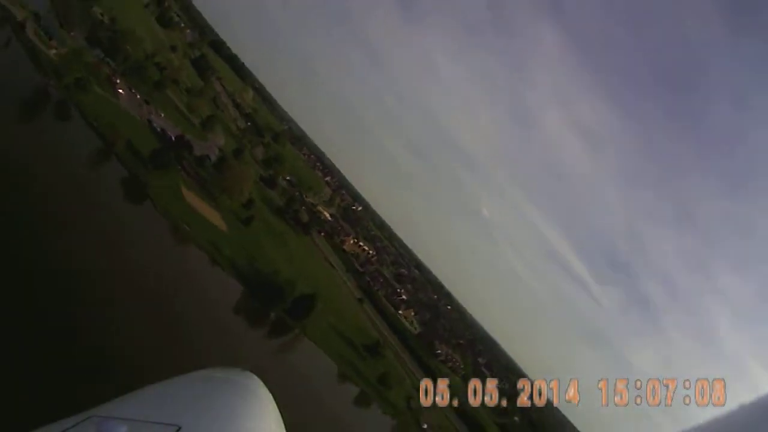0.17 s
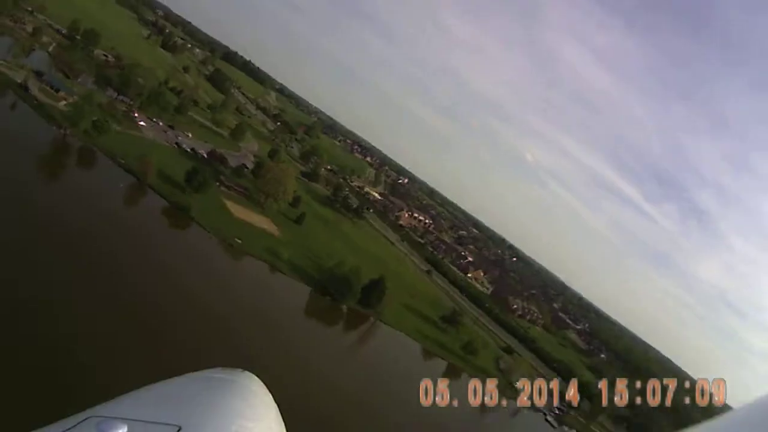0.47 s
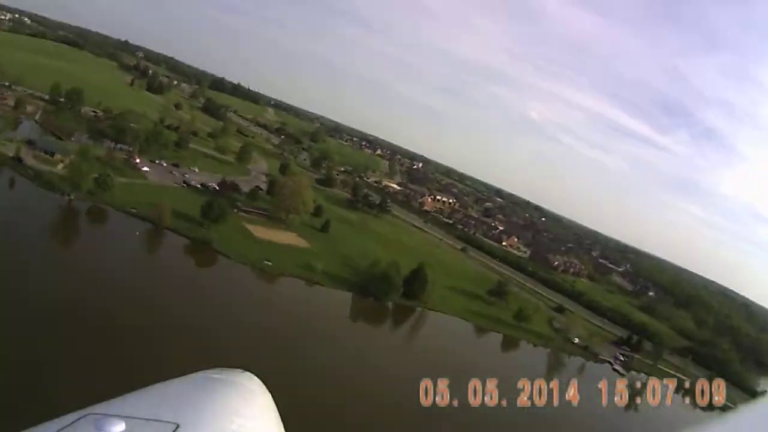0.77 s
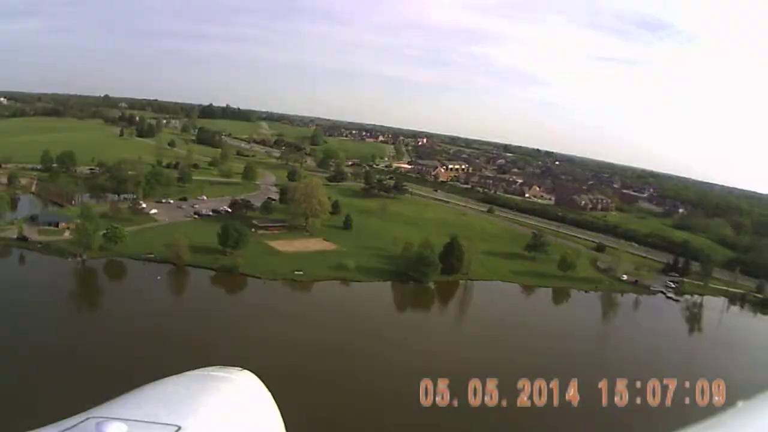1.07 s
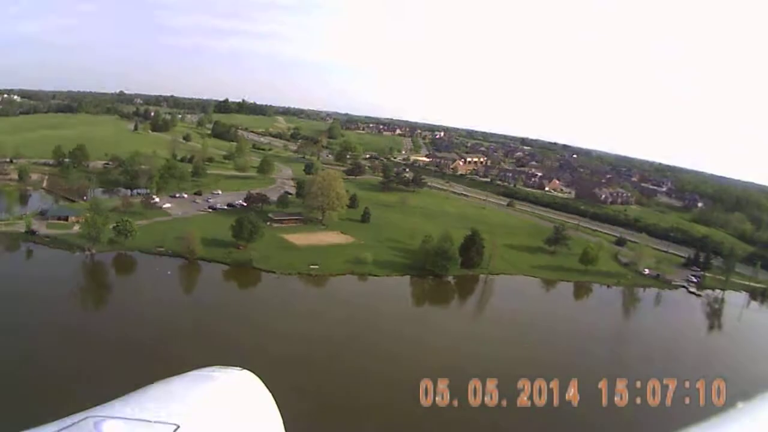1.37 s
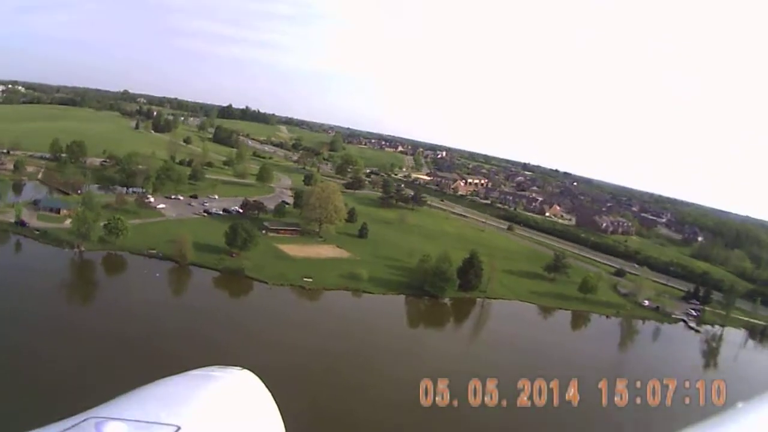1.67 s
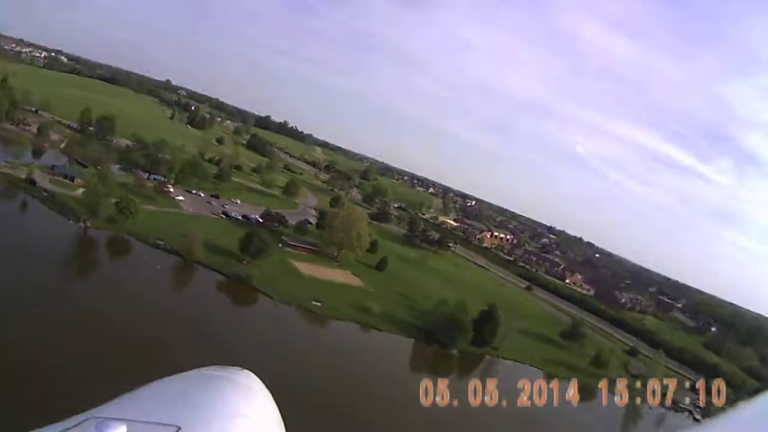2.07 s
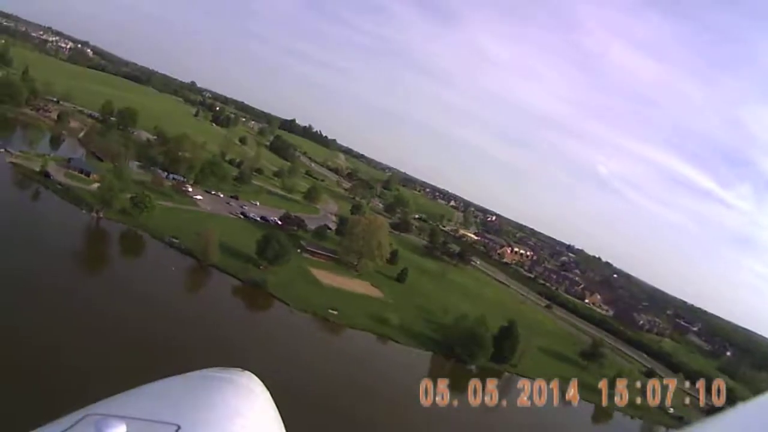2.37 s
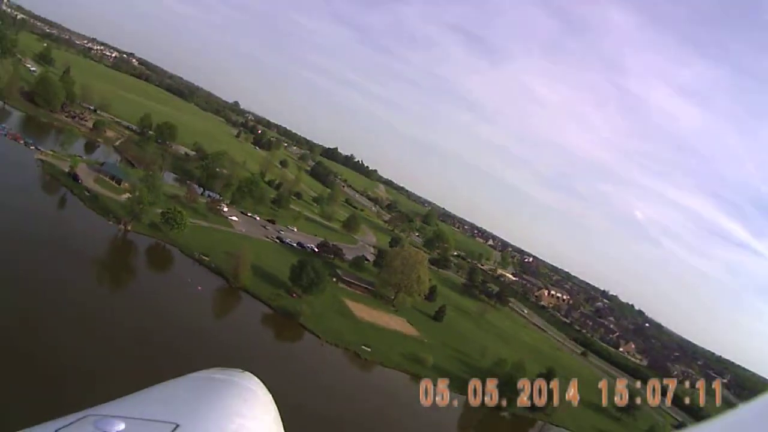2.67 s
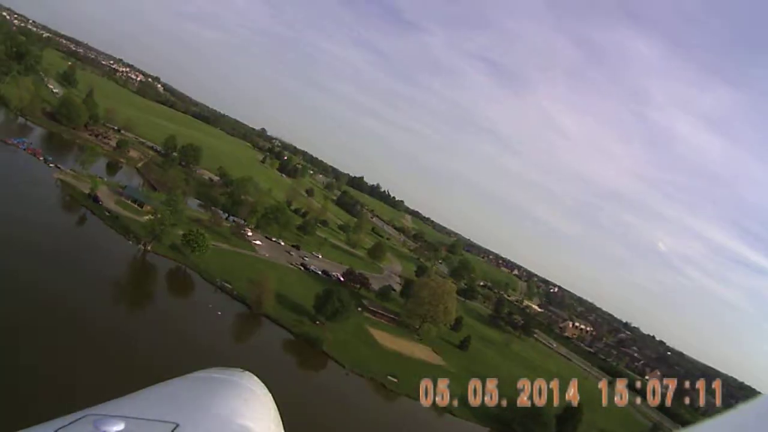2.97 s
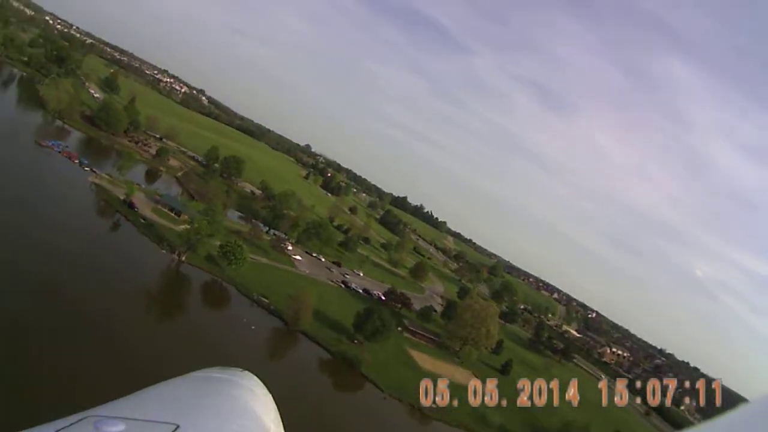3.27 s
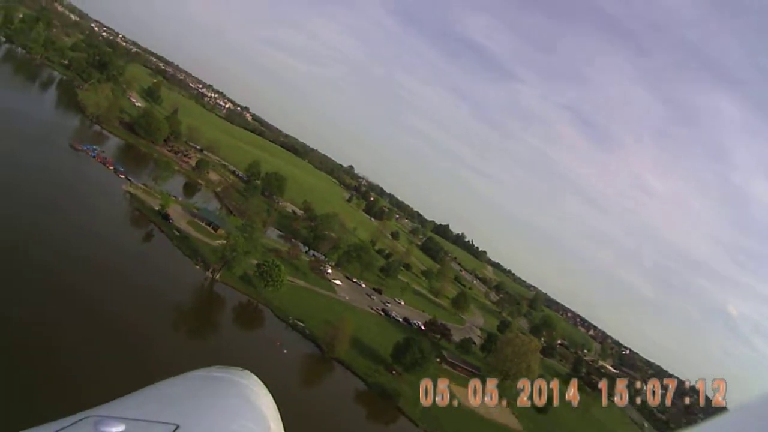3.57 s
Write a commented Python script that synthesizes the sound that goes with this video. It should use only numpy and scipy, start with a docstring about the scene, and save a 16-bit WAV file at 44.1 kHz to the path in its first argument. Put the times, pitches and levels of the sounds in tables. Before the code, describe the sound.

A model plane's propeller drones loudly at full throttle, slightly overloading the onboard microphone. From about 0.3 to 0.8 seconds the buzz falls in pitch and softens to a cruising hum with a thin electric motor whine. It rises a little around 1.3 seconds, settles back by 2 seconds and holds until the end, near 3.7 seconds. Wind rushes over the microphone throughout, and everything sounds slightly muffled.

```python
"""A loud propeller drone drops in pitch as an electric model plane eases from full throttle to a cruise.
It is heard from a small camera riding on the plane. Two blades send out periodic pressure pulses,
the motor whines and beats against a tone of its speed controller, and turbulent air rushes over the
camera, whose narrow-band microphone overloads at full throttle."""
import sys
import numpy as np
from scipy import signal
from scipy.fft import rfft, irfft
from scipy.io import wavfile
from scipy.ndimage import uniform_filter1d

SR = 44100
rng = np.random.default_rng(int(sys.argv[2]) if len(sys.argv) > 2 else 0)


def unload_wav(signal):
    """Save mono or channel-first audio to the path in sys.argv[1] as 16-bit WAV at rate SR, clipped to [-1, 1]."""
    wavfile.write(
        sys.argv[1],
        SR,
        np.round(np.clip(np.atleast_2d(signal).T, -1, 1) * 32767).astype(np.int16),
    )


N = 163611


def amp(db):
    """Amplitude ratio: tenfold for every 20 decibels."""
    return 10 ** (np.asarray(db) / 20)


def unit_rms(x):
    """Normalisation to a root-mean-square value of one."""
    return x / np.sqrt(np.mean(x ** 2) + 1e-20)


def drift(hz):
    """Random fluctuation: low-pass noise of rms one, rolling off around the given rate."""
    f = np.fft.rfftfreq(N, 1 / SR)
    return unit_rms(irfft(rfft(rng.standard_normal(N)) * np.exp(-(f / hz) ** 2), N))


def part_throttle(throttle):
    """Weight of rough running: one at half throttle, zero at cruise (0) and at full throttle (1)."""
    return np.sin(np.pi * throttle) ** 4


def partial(cycles, cruise_db, full_db, throttle, waver_db):
    """Resonance: a wavering sinusoid swells as its frequency passes through a mode of the airframe."""
    # Airframe resonances. Each row: centre in Hz, width in Hz, peak gain in dB.
    modes = [(778, 35, 15.5), (1280, 31, 11.5), (2052, 70, 3.5)]
    hz = np.gradient(cycles) * SR
    lift_db = sum(db * np.exp(-((hz - centre) / width) ** 2) for centre, width, db in modes)
    level_db = cruise_db + (full_db - cruise_db) * throttle + lift_db + waver_db * drift(waver_hz := 10)
    return np.sqrt(2) * amp(level_db) * np.cos(2 * np.pi * cycles)


def propeller(turns, throttle):
    """Harmonics sum to a pressure dip per blade: sharp at full throttle, rounder and uneven at cruise."""
    # Shaft harmonics; even orders are blade passes, odd ones imbalance.
    # Each row: order in cycles per turn, level at cruise in dB, level at full throttle in dB.
    harmonics = [(1, -28, -30), (2, -20, -7), (3, -28.5, -20.5), (4, -24, -13.5), (5, -56, -28),
                 (6, -31, -18.5), (7, -37, -29), (8, -42, -36), (10, -40.5, -32), (12, -40, -42.5),
                 (13, -43, -33.5), (15, -41, -47.5), (16, -45, -35.5), (18, -49.5, -36.5)]
    cruise_jitter, full_jitter = 0.008, 0.001  # turns rms
    turns = turns + (cruise_jitter + (full_jitter - cruise_jitter) * throttle) * drift(hz=40)
    rounding_rad, smear_rad = 1 - throttle, 0.03  # phase shifts that shape the pulse
    pressure = np.zeros(N)
    for order, cruise_db, full_db in harmonics:
        cycles = order * turns + (rounding_rad - smear_rad * order ** 2) / (2 * np.pi)
        pressure -= partial(cycles, cruise_db, full_db, throttle, waver_db=0.94)
    return pressure


def motor(turns, throttle):
    """Beating: near cruise the magnet whine meets a sideband of the controller's switching tone."""
    magnets, steps_per_turn, switch_hz = 14, 42, 8055.36
    wobble_turns = 0.00062 + 0.0031 * part_throttle(throttle)  # uneven rotation
    turns = turns + wobble_turns * drift(hz=70)
    passes = magnets * turns
    commutation = steps_per_turn * turns
    switching = switch_hz * np.arange(N) / SR
    whine = partial(passes, -31.5, -25.5, throttle, waver_db=0.26)
    upper_whine = partial(commutation / 2, -40.5, -57.5, throttle, waver_db=1.9)
    sideband = partial(switching - commutation, -30.5, -38, throttle, waver_db=1.05)
    octave = partial(2 * passes, -56, -56, throttle, waver_db=1.2)
    octave_sideband = partial(switching - 2 * passes, -56, -56, throttle, waver_db=1.2)
    return whine + upper_whine + sideband + octave + octave_sideband


def slipstream(turns, throttle):
    """Turbulence over the camera makes broadband noise, amplitude-modulated by the passing blades."""
    # Spectrum of the rushing air. Each row: frequency in Hz, relative spectral density in dB.
    spectrum = [(20, -30), (50, -4), (100, -1), (180, 5), (380, 4.5), (700, 0.5), (1200, -2.5), (2000, -9),
                (2800, -12), (3900, -13.5), (4500, -36.5)]
    frame, patch_db = 512, 0.5
    real, imag, patches = rng.standard_normal((3, frame // 2 + 1, 2 * N // frame + 4))
    patches = uniform_filter1d(patches, size=7, axis=0)  # level ripples, smooth across frequency
    patches = unit_rms(uniform_filter1d(patches, size=5, axis=1))  # and across time
    noise = signal.istft((real + 1j * imag) * amp(patch_db * patches), nperseg=frame)[1][:N]
    cruise_depth, full_depth = 0.14, 0.7
    depth = cruise_depth + (full_depth - cruise_depth) * throttle
    pulsed = noise * (1 + depth * np.cos(2 * np.pi * 2 * turns))
    knot_hz, knot_db = np.transpose(spectrum)
    hz = np.fft.rfftfreq(N, 1 / SR)
    colour = amp(np.interp(np.log(hz + 1), np.log(knot_hz), knot_db))
    gust_db = 0.83 * drift(hz=30)
    level_db = -19.5 - 0.5 * throttle + 2.24 * part_throttle(throttle) + gust_db
    return unit_rms(irfft(rfft(pulsed) * colour, N)) * amp(level_db)


def scene():
    """Superposition of propeller, motor and slipstream, all governed by the speed of one shaft."""
    # Course of the shaft speed. Each row: time in seconds, speed in turns per second.
    shaft_speed = [(0, 175.15), (.285, 175.12), (.391, 165.88), (.523, 163.59), (.629, 152.276),
                   (.729, 145.467), (.846, 142.888), (1.168, 142.902), (1.294, 149.68), (1.409, 148.914),
                   (1.614, 147.843), (1.859, 144.152), (1.982, 144.448), (2.175, 142.832), (2.404, 143.224),
                   (2.607, 142.842), (2.733, 142.893), (2.794, 144.444), (3.005, 144.234), (3.08, 143.87),
                   (3.19, 143.985), (3.29, 144.02), (3.36, 144.19), (3.5, 144.1), (3.61, 144.05),
                   (3.66, 143.84)]
    cruise_hz, full_hz = 146, 175
    speed = np.interp(np.arange(N) / SR, *np.transpose(shaft_speed))
    turns = (np.cumsum(speed) - speed) / SR
    throttle = np.clip((speed - cruise_hz) / (full_hz - cruise_hz), 0, 1) ** 0.75
    return (propeller(turns, throttle) + motor(turns, throttle) + slipstream(turns, throttle))[None]


def record(dry):
    """Saturation: the microphone bottoms out; the camera keeps a narrow band and clips what overshoots."""
    limit, knee = np.where(dry < 0, 0.71, 0.81), 8  # negative swings saturate sooner
    saturated = dry / (1 + abs(dry / limit) ** knee) ** (1 / knee)
    low_cut_hz, edge_hz, slope_hz = 35, 4162, 240
    hz = np.fft.rfftfreq(2 * N, 1 / SR)
    low_pass = amp(-10 * (np.maximum(hz - edge_hz, 0) / slope_hz) ** 2)
    high_pass = hz / np.hypot(hz, low_cut_hz)
    narrow = irfft(rfft(saturated, 2 * N) * low_pass * high_pass, 2 * N)[:, :N]
    clipped = np.clip(narrow, -0.717, 0.717)
    treble_cut = signal.firwin(511, cutoff=15800, window=("kaiser", 9), fs=SR)
    return signal.oaconvolve(clipped, treble_cut[None], "same")


dry = scene()
out = record(dry)
unload_wav(out)
```